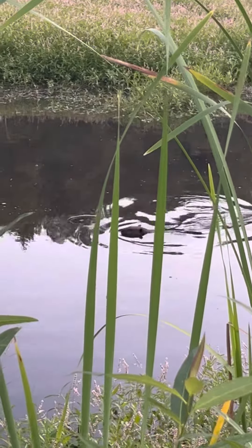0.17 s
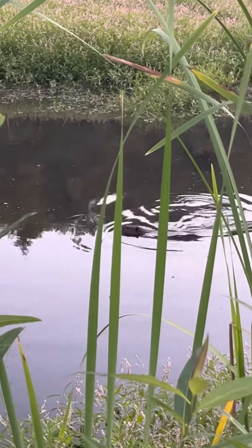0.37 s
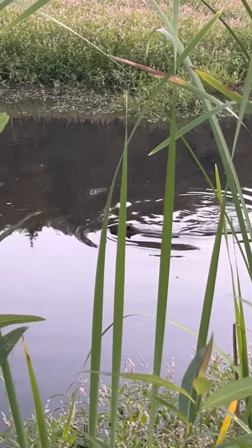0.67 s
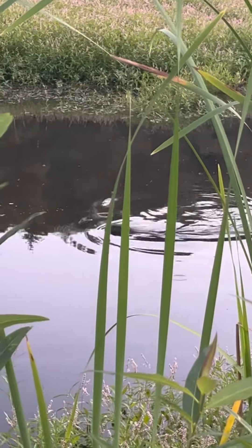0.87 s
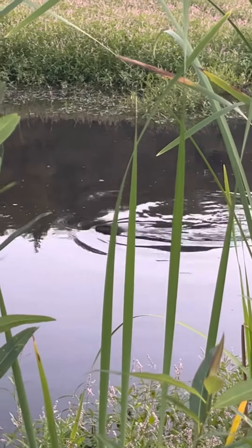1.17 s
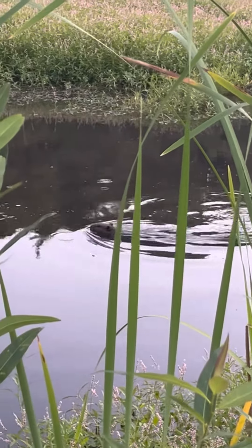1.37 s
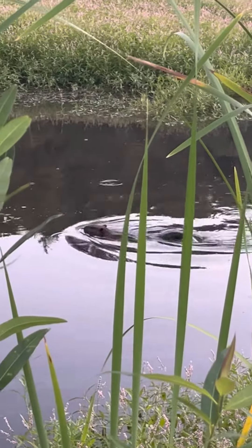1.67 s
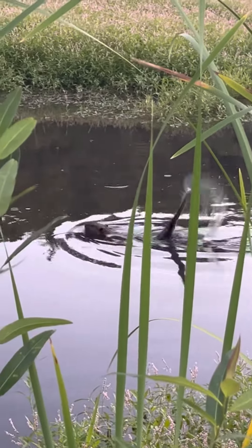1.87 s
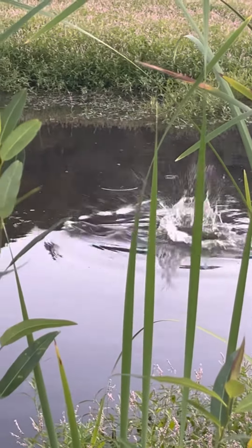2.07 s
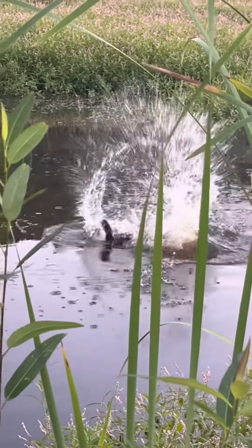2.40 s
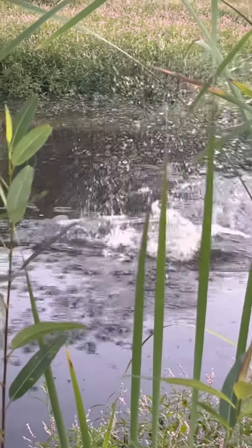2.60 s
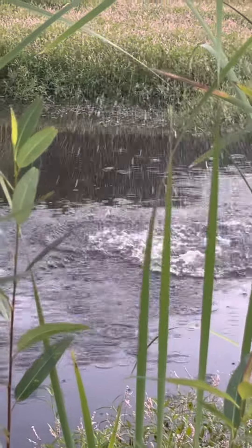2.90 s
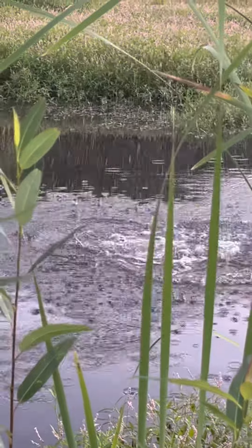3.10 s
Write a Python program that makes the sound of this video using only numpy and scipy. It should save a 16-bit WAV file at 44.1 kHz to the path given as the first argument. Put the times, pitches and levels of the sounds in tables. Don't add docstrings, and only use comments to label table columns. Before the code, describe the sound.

Low distant road rumble in open air, a faint trickle off a lifting tail, one hard slap on water, a brief gap, then a hollow booming splash, glugs and ticking drops close to a handheld phone.

```python
import sys
import numpy as np
from scipy import signal
from scipy.fft import rfft, irfft, next_fast_len
from scipy.io import wavfile
from scipy.ndimage import uniform_filter1d

SR = 44100
rng = np.random.default_rng(int(sys.argv[2]) if len(sys.argv) > 2 else 0)


def persist_wave(psi):
    counts = np.round(np.clip(psi, -1, 1) * 32767).astype(np.int16)
    wavfile.write(sys.argv[1], SR, np.atleast_2d(counts).T)


def makeup_ratio(level_db):
    decades = np.asarray(level_db, float) / 20
    return 10 ** decades


N = 143325

# (frequency [Hz], level [dB])
FIZZ = [(1200, -18.5), (2200, -8), (4300, 2.5), (7500, -3), (9800, -13), (12000, -5), (17000, -17.5)]
GLUG_GLIDE = 3.7


def evened(x):
    return x / np.sqrt(np.mean(x ** 2) + 1e-20)


def read(points, hz):
    f, value = np.transpose(points)
    return np.interp(np.log(hz + 1), np.log(f + 1), value)


def along(table, column):
    rows = np.array(table)
    return np.interp(np.arange(N) / SR, rows[:, 0], rows[:, column], left=-150 * (column == 1))


def add(mix, s, sound):
    part = mix[round(s * SR):][:len(sound)]
    part += sound[:len(part)]


def tint(x, points):
    gain = makeup_ratio(read(points, np.fft.rfftfreq(len(x), 1 / SR)))
    return evened(irfft(rfft(x) * gain, len(x)))


def bubble(hz, t60, rise_s):
    t = np.arange(0, t60, 1 / SR)
    envelope = np.minimum(t / rise_s, 1) * makeup_ratio(-60 * t / t60)
    return envelope * np.sin(2 * np.pi * hz * t * (1 + GLUG_GLIDE * t))


def grains(points, per_s, cycles, spread_db, flicker_db, count=30):
    clumps = uniform_filter1d(uniform_filter1d(rng.standard_normal(N), size=300), size=200)
    uneven_db = spread_db * np.minimum(rng.exponential(1, N), 4)
    size = makeup_ratio(uneven_db + flicker_db * evened(clumps)) * (rng.random(N) < per_s / SR)
    kind, out = rng.integers(0, count, N), np.zeros(N)
    for k, hz in enumerate(np.geomspace(points[0][0], points[-1][0], count)):
        u = np.arange(0, 3 * cycles, hz / SR)
        shape = (1 - np.exp(-3 * u)) * np.exp(-2 * u / cycles)
        shape *= np.sin(2 * np.pi * u * (1 + 0.028 * u))
        shape *= makeup_ratio(read(points, hz)) * np.sqrt(hz) / np.linalg.norm(shape)
        out += signal.oaconvolve(size * (kind == k), shape)[:N]
    return evened(out)


def bed(points, patchy_db, swell_db):
    frames, hz = N // 512 + 5, np.fft.rfftfreq(2048, 1 / SR)
    a, b, patches = rng.standard_normal((frames, 1025, 3)).T
    patches = evened(uniform_filter1d(uniform_filter1d(patches, size=12, axis=0), size=6, axis=1))
    swell = evened(uniform_filter1d(rng.standard_normal(frames), size=30))
    level_db = read(points, hz)[:, None] + patchy_db * patches + swell_db * swell
    z = (a + 1j * b) * makeup_ratio(level_db)
    return evened(signal.istft(z, nperseg=2048, noverlap=1536)[1][:N])


def tail():
    # (time [s], peak [dB], ring [Hz], ring t60 [s], spatter [dB])
    blows = [
        (1.9423, -16, 1200, .0028, -42),
        (1.9444, -26, 1300, .005, -50),
        (1.9424, -22, 2300, .003, -50),
        (1.9508, -28, 3400, .008, -33),
        (1.9508, -36, 15000, .006, -40),
        (1.9523, -16, 1450, .005, -30),
        (1.952, -17.5, 2800, .004, -36),
        (1.8168, -43, 2300, .012, -60),
        (1.817, -44, 3100, .009, -62),
        (1.8172, -47, 5100, .01, -60),
    ]
    blow_rise_s, spatter_rise_s, spatter_t60 = .003, .002, .024
    out, t = np.zeros(N), np.arange(-.004, .06, 1 / SR)
    for s, db, hz, t60, spatter_db in blows:
        envelope = makeup_ratio(db - 60 * np.maximum(t / t60, -t / blow_rise_s))
        ring = envelope * np.cos(2 * np.pi * (hz * t + 0.13))
        burst = tint(rng.standard_normal(len(t)), FIZZ) * np.clip(1 + t / spatter_rise_s, 0, 1) ** 2
        burst *= makeup_ratio(spatter_db - 60 * np.maximum(t, 0) / spatter_t60)
        add(out, s + t[0], ring + burst)
    return out


def cavity():
    # (time [s], pitch [Hz], level [dB])
    pocket = [
        (2.186, 106, -72),
        (2.198, 101, -25),
        (2.209, 67, -23),
        (2.235, 42.7, -30),
        (2.26, 43.4, -32),
        (2.294, 55, -20.5),
        (2.311, 61, -31.5),
        (2.325, 79, -22.5),
        (2.353, 72, -45),
    ]
    rows = np.array(pocket)
    t = np.arange(rows[0, 0], rows[-1, 0], 1 / SR)
    turns = 0.45 + np.cumsum(np.interp(t, rows[:, 0], rows[:, 1])) / SR
    level = np.sqrt(2) * makeup_ratio(np.interp(t, rows[:, 0], rows[:, 2]))
    out = np.zeros(N)
    add(out, t[0], level * np.sin(2 * np.pi * turns))
    return out


def glugging():
    # (time [s], peak [dB], pitch [Hz], t60 [s])
    glugs = [(2.124, -41, 1636, 0.031), (2.18, -28.5, 773, 0.024), (2.19, -30, 310, 0.038),
             (2.186, -33.5, 1650, .02), (2.2435, -21, 1040, 0.014), (2.262, -37, 743, 0.07),
             (2.266, -32, 1650, 0.014), (2.2765, -18, 700, 0.016), (2.276, -25, 940, 0.016),
             (2.285, -24.5, 398, 0.018), (2.313, -29, 664, 0.033), (2.314, -26.5, 268, 0.088),
             (2.34, -24, 457, 0.017), (2.356, -32.5, 910, 0.047), (2.357, -29, 457, 0.042),
             (2.448, -23.5, 1040, 0.023), (2.468, -31, 2120, 0.024), (2.51, -33.5, 813, 0.034),
             (2.565, -30.5, 840, 0.017), (2.566, -27.5, 1380, .014), (2.583, -28.5, 810, 0.025),
             (2.584, -31.5, 1150, .02), (2.592, -36, 940, .02), (2.594, -32.5, 263, 0.041),
             (2.665, -30.5, 894, 0.016), (2.722, -34.5, 1210, 0.018), (3.218, -35.5, 2140, 0.018),
             (2.206, -36, 895, .015), (2.222, -37, 1330, 0.042), (2.236, -40, 1590, 0.01),
             (2.267, -30, 2150, 0.017), (2.332, -35.5, 1560, 0.019), (2.173, -42, 1650, 0.019),
             (2.257, -36, 1980, 0.011), (2.286, -34, 1370, .015), (2.316, -34.5, 2200, 0.017),
             (2.513, -36, 1410, .03), (2.545, -37, 1310, .02), (2.622, -44, 1290, .025),
             (2.627, -38.5, 2170, .03), (2.705, -38, 2170, .03), (2.735, -35, 193, 0.045),
             (2.757, -51, 844, 0.022), (2.839, -35, 2160, .015), (2.927, -39, 2010, 0.016),
             (3.016, -33.5, 1600, 0.013), (3.129, -47, 1580, .015), (1.85, -47.5, 284, 0.084),
             (1.89, -45, 331, .08), (3.175, -41.5, 2020, 0.015)]
    rise_s, company_db, company_s = 0.0016, -9, .02
    out = np.zeros(N)
    for s, db, hz, t60 in glugs:
        add(out, s, makeup_ratio(db) * bubble(hz, t60, rise_s))
        for late, ratio in rng.uniform(-1, 1, (3, 2)):
            neighbour = bubble(hz * 1.63 ** ratio, t60, rise_s)
            add(out, s + company_s * late, makeup_ratio(db + company_db) * neighbour)
    return out


def near_drops():
    # (time [s], peak [dB], pitch [Hz])
    landing = [(2.177, -50, 2640), (2.1855, -43, 3560), (2.212, -30, 3300), (2.3002, -31, 5140),
               (2.3785, -36, 3630), (2.41, -50, 3530), (2.4729, -38, 3960), (2.5905, -51.5, 4440),
               (2.689, -38.5, 4800), (2.7203, -34, 3500), (2.7616, -31, 3660), (2.8216, -42, 4600),
               (2.8959, -33, 3980), (2.9927, -38.5, 8350), (3.0427, -40, 4470), (3.064, -32.5, 5440),
               (3.0987, -56, 4400), (3.1144, -32.5, 3230), (3.1534, -39, 3430), (3.1803, -33, 4840),
               (2.515, -43, 3930), (2.775, -37, 4400), (2.912, -36, 3920), (2.944, -57, 8300),
               (2.953, -51, 4500), (2.976, -50, 4200), (3.018, -37, 8370), (3.075, -40, 4500),
               (3.101, -40, 10400), (3.174, -48, 4200), (3.19, -34.5, 7400), (3.192, -41, 4800),
               (3.202, -39, 7150), (3.2097, -53, 3800), (3.24, -35.5, 7600), (2.63, -43, 3300),
               (2.85, -47, 3400)]
    # (time [s], peak [dB], pitch [Hz])
    drips = [(1.784, -64, 3430), (1.789, -57, 5600), (1.817, -54, 8600), (1.823, -45, 4840),
             (1.831, -57, 8000), (1.852, -56, 4700), (1.859, -57, 4600), (1.871, -59, 4500),
             (1.913, -75, 6000), (1.921, -58, 14500), (2.105, -62, 8000), (2.0, -58, 4200),
             (2.035, -42, 3500), (2.05, -48, 4800), (2.1215, -46.5, 3320)]
    t60, tick_db, drop_db, rise_s = .0045, -8, 4, 0.00055
    out, t = np.zeros(N), np.arange(0, .03, 1 / SR)
    for s, db, hz in landing + drips:
        tick = tint(rng.standard_normal(len(t)), FIZZ) * makeup_ratio(tick_db - 60 * t / t60)
        add(out, s, makeup_ratio(db + drop_db) * tick)
        add(out, s, makeup_ratio(db + drop_db) * bubble(hz, t60, rise_s))
    return out


def spray():
    # (time [s], amount [dB], share of large drops [dB])
    falling = [
        (1.95, -38.5, 7), (1.972, -52.5, -10.5), (2.004, -62, 5.5), (2.044, -54.5, -8),
        (2.066, -61.5, -6), (2.16, -66, 1),
        (2.165, -61, 7.5), (2.187, -49, -0.5), (2.287, -51, 4.5), (2.343, -54, 0.5),
        (2.453, -54.5, 5.5), (2.473, -44, -2), (2.5, -51, 0),
        (2.51, -52, 4), (2.536, -57, 6.5), (2.6, -52, 3), (2.68, -52.5, 2.5), (2.78, -50.5, -0.5),
        (2.788, -52.5, -2.5), (3.172, -53.5, -5.5), (3.18, -52, -10), (3.228, -52.5, -7), (3.25, -60.5, -4)]
    # (time [s], amount [dB])
    running = [
        (1.77, -105),
        (1.79, -82),
        (1.812, -84),
        (1.817, -63),
        (1.84, -62),
        (1.865, -71.5),
        (1.92, -75.5),
        (1.93, -73),
    ]
    # (frequency [Hz], level [dB])
    large = [(80, 3.5), (250, -8), (700, -3), (1300, -3.5), (2200, -4.5), (3500, -13.5)]
    amount = along(falling, 1)
    fizz = grains(FIZZ, per_s=9000, cycles=2.2, spread_db=1.0, flicker_db=1.5)
    gurgle = grains(large, per_s=4600, cycles=6.1, spread_db=0.5, flicker_db=0.27)
    runoff = makeup_ratio(along(running, 1)) * (np.arange(N) / SR < running[-1][0])
    fine = fizz * (makeup_ratio(amount + 2.5) + runoff)
    return fine + gurgle * makeup_ratio(amount + 4 + along(falling, 2))


def road():
    # (frequency [Hz], density [dB per Hz])
    rumble = [(15, -45.5), (25, -20), (46, -3.5), (76, 0.5), (165, -21.5), (403, -26.5), (528, -28.5),
              (1270, -33), (2600, -63.5), (3380, -77.5), (5720, -120)]
    # (time [s], level [dB])
    traffic = [(0, 0), (.12, 0), (.3, -1), (.55, -1), (.8, 0.5), (1.15, 0), (1.5, .3), (1.75, -0.5),
               (2.0, 0.5), (2.4, 1.5), (2.65, 1.5), (2.95, 0.5), (3.25, -0.5)]
    return makeup_ratio(-40 + along(traffic, 1)) * bed(rumble, patchy_db=1.36, swell_db=0.38)


def reeds():
    # (frequency [Hz], density [dB per Hz])
    rustle = [(1800, -27), (2600, -6.5), (3500, 4), (4400, -6.5), (6000, -32)]
    # (time [s], level [dB])
    breeze = [(0, -99), (.15, -91), (.4, -96), (.73, -86), (.85, -91), (1.15, -91.5), (1.34, -86),
              (1.5, -92), (1.75, -86), (3.25, -96)]
    return makeup_ratio(along(breeze, 1)) * bed(rustle, patchy_db=6.0, swell_db=-5.5)


def open_air():
    # (frequency [Hz], density [dB per Hz])
    hiss = [(300, -1.5), (1800, -5.5), (2800, -16), (4300, -30), (6000, -29.5), (12000, -42), (13000, -56)]
    return makeup_ratio(-66) * bed(hiss, patchy_db=1.5, swell_db=-4.0)


def scene():
    water = tail() + cavity() + glugging() + near_drops() + spray()
    return np.tile(water + road() + reeds() + open_air(), (2, 1))


def widen(dry):
    # (frequency [Hz], lead [turns])
    leads = [(0, 0), (150, -.016), (380, -.095), (950, -.105), (1800, 0), (2720, .38), (4100, .09),
             (5830, .5)]
    hz_per_turn, scatter_db, scatter_t60 = 6650, -23.5, .03
    low_hz, edge_hz = 40.8, 15800
    size = next_fast_len(N + 8192)
    hz, t = np.fft.rfftfreq(size, 1 / SR), np.arange(0, .034, 1 / SR)
    beyond = np.maximum(hz - leads[-1][0], 0) / hz_per_turn
    lead = np.pi * (np.interp(hz, *np.transpose(leads)) + beyond)
    bent = rng.standard_normal(len(t)) * makeup_ratio(-60 * t / scatter_t60)
    bent = rfft(bent / np.linalg.norm(bent), size) * makeup_ratio(scatter_db)
    bent *= hz ** 2 / (hz ** 2 + 300.0 ** 2)
    gain = np.exp(1j * np.array([lead, -lead])) * np.array([1 + bent, 1 - bent])
    gain *= np.clip((edge_hz + 100 - hz) / 200, 0, 1) / np.sqrt(1 + (low_hz / (hz + 1)) ** 8)
    return irfft(rfft(dry, size) * gain, size)[:, :N]


def mute(pair):
    # (frequency [Hz], level [dB])
    below = [(1000, -30), (1800, -15), (4000, -22), (6000, -12), (9200, -5.5), (12400, -5), (15000, -7)]
    sudden = [
        1.82,
        1.92,
        1.945,
        2.175,
        2.475,
    ]
    bins, jitter_db = 10, 2.5
    mid_side = np.array([pair[0] + pair[1], pair[0] - pair[1]]) / 2
    hz, t, z = signal.stft(mid_side, SR, nperseg=1024)
    band = np.arange(len(hz)) // bins * bins
    power = uniform_filter1d(uniform_filter1d(abs(z) ** 2, size=bins, axis=1), size=5, axis=2)
    power = power[:, np.minimum(band + bins // 2, len(hz) - 1)]
    jitter = rng.standard_normal((len(t) // 2 + 1, len(hz))).repeat(2, axis=0)[:len(t), band].T
    limit = makeup_ratio(2 * (read(below, hz)[:, None] + jitter_db * jitter))
    steady = abs(t[:, None] - sudden).min(axis=1) > .018
    weak = (power < limit * power[::-1]) & steady
    mid, side = signal.istft(z * ~weak, SR, nperseg=1024)[1][:, :N]
    return np.array([mid + side, mid - side])


def band_limit(x):
    return signal.sosfilt(signal.butter(12, 16470, fs=SR, output="sos"), x)


def record(dry):
    mix = mute(widen(dry))
    return band_limit(mix)


dry = scene()
out = record(dry)
persist_wave(out)
```